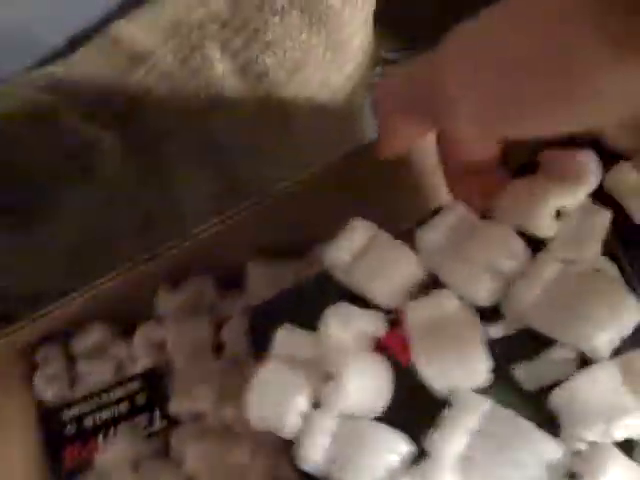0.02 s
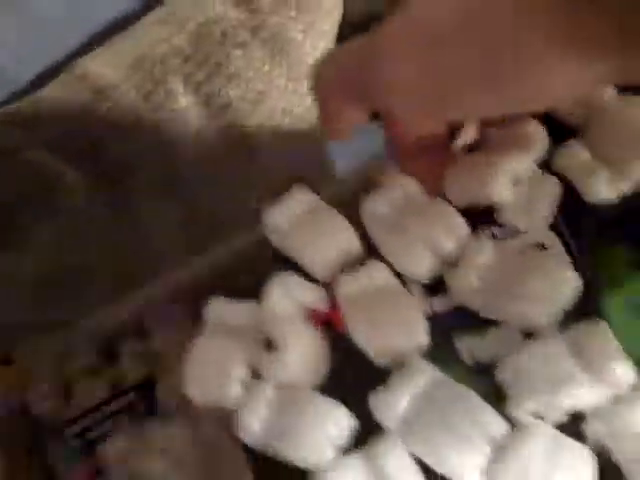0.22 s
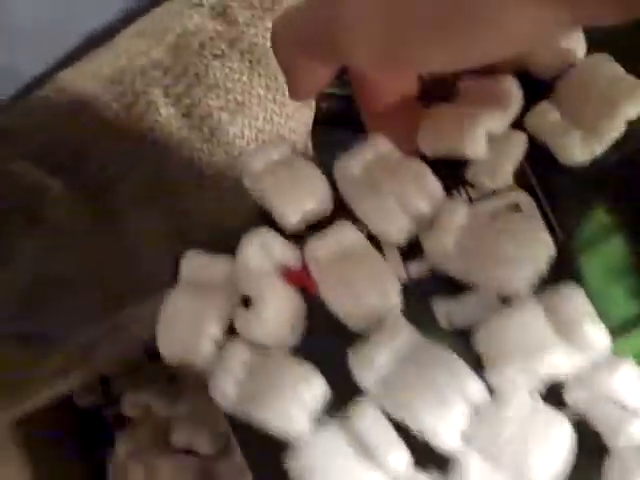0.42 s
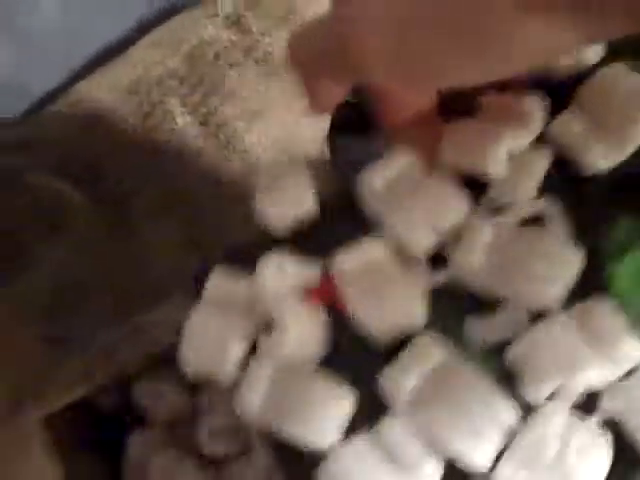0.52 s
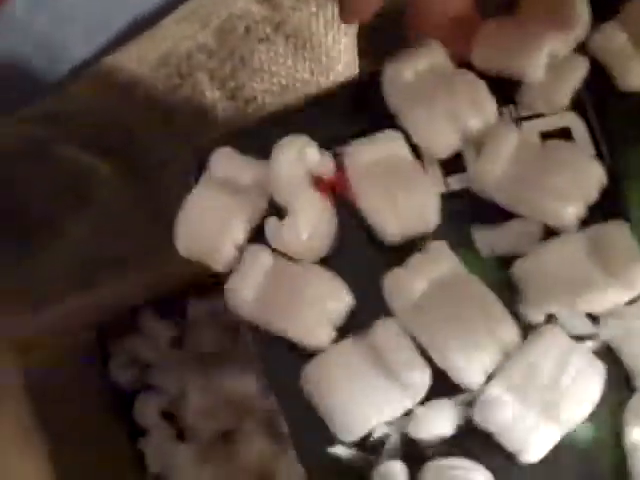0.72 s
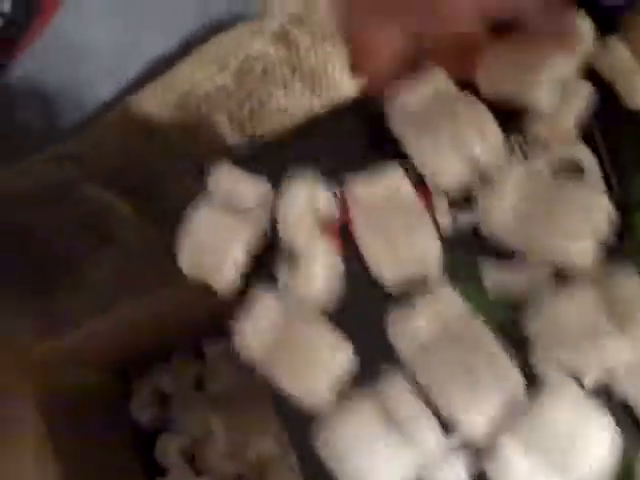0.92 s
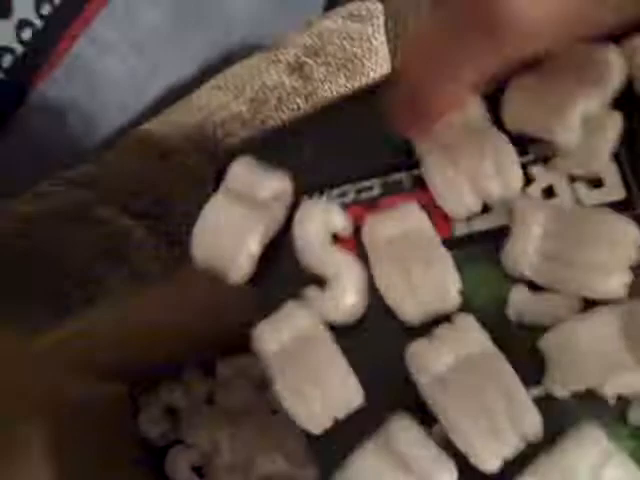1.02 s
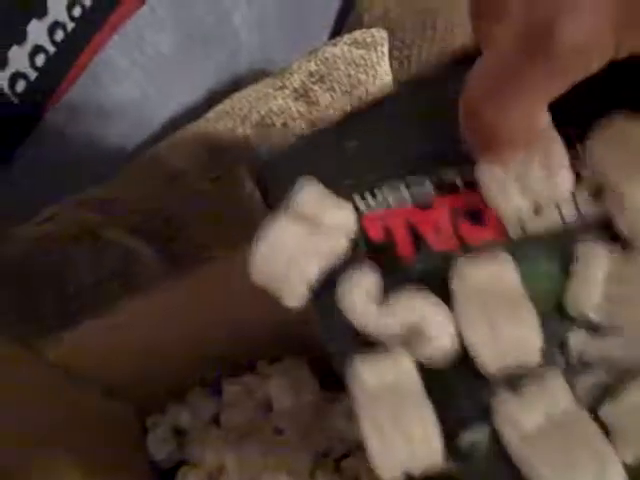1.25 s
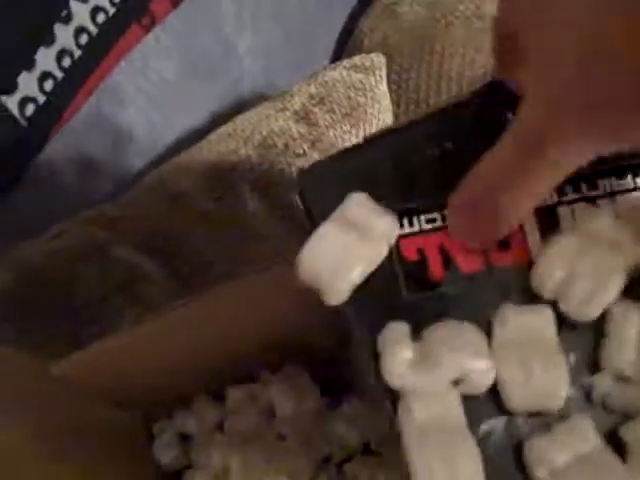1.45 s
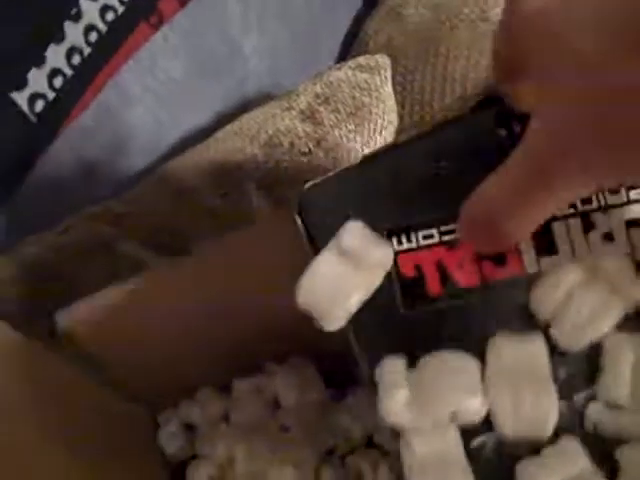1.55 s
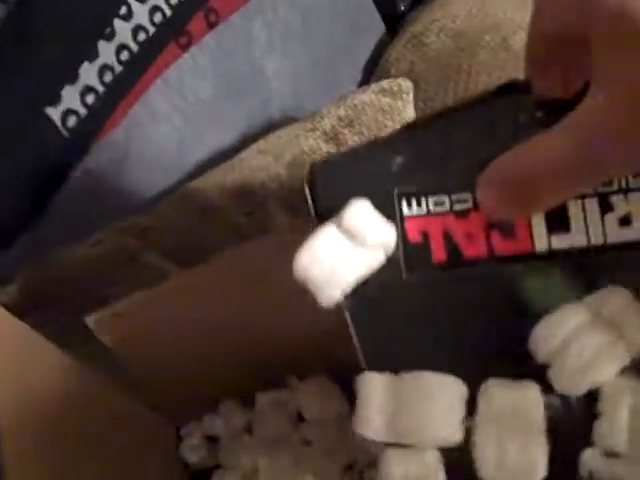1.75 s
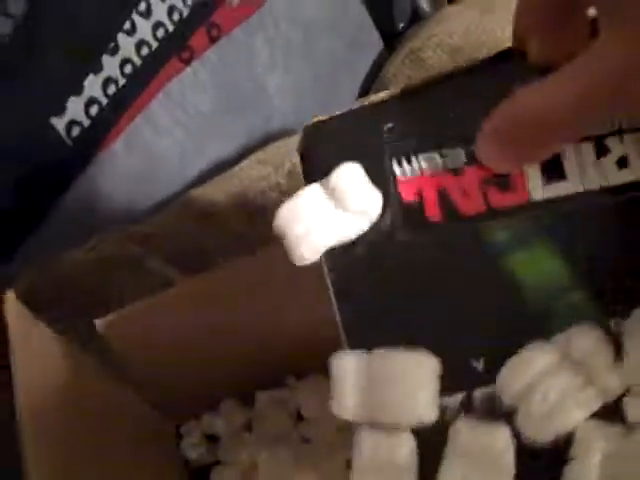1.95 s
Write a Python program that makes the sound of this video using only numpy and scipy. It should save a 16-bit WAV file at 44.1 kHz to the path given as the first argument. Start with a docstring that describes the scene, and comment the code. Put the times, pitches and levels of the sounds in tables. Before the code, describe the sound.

A hand stirs loose foam peanuts and drags a flat package up: faint rubbing, dull box knocks, loud brittle snaps and stuttering squeaks midway, then sparse scuffs, heard very close with bright ringing treble.

```python
"""A hand digs through foam packing peanuts in a cardboard box and draws a flat package up through them.
First the foam rustles and the package scrapes: tiny catches over smooth rubbing, as shaped noise.
Then bumps ring the hollow box as decaying modes; peanuts scuff, crack and squeak in quickening runs of slips.
The stir thins out, with a last few bumps and a scuff near the end; low shoves and a faint room lie under it.
A small camera hears it from close by, its two microphone ports ringing in the treble."""
import sys
import numpy as np
from scipy import signal
from scipy.fft import rfft, irfft
from scipy.io import wavfile
from scipy.ndimage import uniform_filter1d, map_coordinates

SR = 44100
rng = np.random.default_rng(int(sys.argv[2]) if len(sys.argv) > 2 else 0)


def transcribe(u):
    """Save the signal u as a 16-bit wav file named by the first command-line argument.

    u: samples, shape (n,) or (channels, n), limited to [-1, 1]; the rate is SR.
    q: integer samples, one column per channel.
    """
    v = np.clip(np.atleast_2d(u).T, -1, 1)
    q = np.round(v * 32767).astype(np.int16)
    wavfile.write(sys.argv[1], SR, q)


N = 88200
T = np.arange(N) / SR
HZ = np.fft.rfftfreq(2 * N, 1 / SR)
PATCH_WINDOW = 1024  # samples
# friction of sliding surfaces: catches per second, spread of their sizes in dB, power share of smooth rubbing
SLIDING = (980, 2, 0.52)


def amp(db):
    """Decibels to gain."""
    return 10 ** (np.asarray(db) / 20)


def unit(x):
    """Scale to rms 1."""
    return x / np.sqrt(np.mean(x ** 2) + 1e-20)


def along(points, hz=HZ):
    """Interpolate (Hz, value) points on a log frequency axis."""
    f, v = np.transpose(points)
    return np.interp(np.log(hz + 1), np.log(f + 1), v)


def curves(rows):
    """One value per sample for each column after the time."""
    s, *cols = np.transpose(rows)
    return [np.interp(T, s, c) for c in cols]


def wobble(knots_per_s):
    """Smooth random curve through normally distributed knots."""
    knots = rng.standard_normal(int(N * knots_per_s / SR) + 4)
    return map_coordinates(knots, [T * knots_per_s])


def filtered(x, response):
    """Apply a frequency response, zero-padded to twice the length."""
    return irfft(rfft(x, 2 * N) * response)[..., :N]


def colour(points):
    """Minimum-phase response of unit power with the given spectrum, by folding the cepstrum."""
    cepstrum = irfft(np.log(unit(amp(along(points)))))
    cepstrum[1:N] *= 2
    cepstrum[N + 1:] = 0
    return np.exp(rfft(cepstrum))


def spread(pair):
    """Two unrelated signals become a left and right that are partly alike, by frequency."""
    # Each row: frequency in Hz, left-right correlation.
    likeness = [(100, 0.75), (400, 0.86), (1000, 0.69), (3000, 0.55), (6000, 0.58), (8000, 0.17),
                (10000, 0.23)]
    turn = np.arccos(np.clip(along(likeness), -1, 1)) / 2
    mid, side = filtered(pair, np.array([np.cos(turn), np.sin(turn)]))
    return np.array([mid + side, mid - side])


def add(track, start_s, sound):
    """Mix a sound into the track in place."""
    part = track[..., max(round(start_s * SR), 0):][..., :sound.shape[-1]]
    part += sound[..., :part.shape[-1]]


def friction(spectrum, catches_per_s, spread_db, smooth_share):
    """Tiny catches of uneven size over smooth rubbing, coloured; stereo, rms 1."""
    size_db = spread_db * np.clip(rng.standard_normal((2, N)), -2, 2)
    sizes = amp(size_db) * rng.choice([-1, 1], (2, N))
    catches = unit(sizes * (rng.random((2, N)) < catches_per_s / SR))
    rubbing = rng.standard_normal((2, N))
    share = np.clip(smooth_share, 0, 1)
    force = np.sqrt(1 - share) * catches + np.sqrt(share) * rubbing
    return unit(spread(filtered(force, colour(spectrum))))


def patchy(x, depth_db):
    """Random gains, drifting over time and frequency, make the noise uneven in colour; rms 1."""
    z = signal.stft(x, nperseg=PATCH_WINDOW)[2]
    field = rng.standard_normal(z.shape[1:])
    field = uniform_filter1d(field, size=4, axis=0)
    field = uniform_filter1d(field, size=7, axis=1)
    gain = amp(depth_db * np.minimum(unit(field), 1))
    return unit(signal.istft(z * gain, nperseg=PATCH_WINDOW)[1][:, :N])


def stirring():
    """Foam rubs on foam, the package scrapes along, and the box rumbles under both."""
    # Each row: time in seconds, foam rustle in dB before its trim, scrape on cardboard in dB.
    stir_levels = [(0,-33.5,-42), (.04,-38,-44), (.065,-36.5,-32.5), (.1,-36,-42), (.135,-34,-41),
                   (.17,-37,-42.5), (.2,-33,-33.5), (.225,-36.5,-39.5), (.25,-33,-36.5), (.29,-36,-42.5),
                   (.348,-29,-33), (.37,-15.5,-29), (.405,-27,-29), (.435,-28.5,-29.5), (.48,-20.5,-30.5),
                   (.56,-24,-36), (.6,-27.5,-37.5), (.66,-27,-35), (.71,-33,-42.5), (.76,-26.5,-34.5),
                   (.8,-28.5,-40), (.85,-26.5,-45), (.9,-28.5,-42.5), (.96,-30,-38.5), (1.035,-35,-41),
                   (1.08,-18.5,-34), (1.115,-33.5,-43.5), (1.2,-31,-40), (1.228,-28.5,-39.5),
                   (1.25,-28,-61), (1.28,-28,-39), (1.31,-30.5,-45), (1.355,-33,-44.5), (1.385,-30,-37),
                   (1.42,-31.5,-53), (1.44,-32.5,-58), (1.458,-39,-41), (1.48,-35,-39.5), (1.53,-34,-50),
                   (1.62,-35.5,-50), (1.675,-38,-51), (1.77,-35,-45), (1.815,-34,-48.5), (1.88,-38,-50.5),
                   (2.0,-41.5,-54)]
    # Each row: time in seconds, hollow rumble of the box in dB before its trim.
    rumble_levels = [(0,-43), (.15,-44), (.29,-39), (.34,-39.5), (.44,-30.5), (.5,-28.5), (.57,-30),
                     (.68,-45), (.77,-47), (.87,-49.5), (.98,-51), (1.06,-45), (1.18,-46.5), (1.38,-42),
                     (1.415,-54), (1.47,-42.5), (1.55,-50.5), (1.67,-53), (1.79,-43), (2.0,-49.5)]
    # Spectra of foam, scrape and box hollow. Each row: frequency in Hz, relative density in dB.
    foam_spectrum, scrape_spectrum, hollow_spectrum = [(40, -70), (300, -27), (1400, -26.5), (2600, -5),
                                                       (4000, -0.5), (5500, 0.5), (7300, 0.5), (8200, -1.5),
                                                       (9000, -2), (10500, -12.5)], [(30, -61), (110, -33), (300, -11),
                                                                     (650, 5.5), (950, 0.5), (1400, -4),
                                                                     (2200, -0.5), (3200, -2.5), (5000, -8),
                                                                     (9000, -36)], [(25, -56), (60, -29.5),
                                                                                     (110, -23),
                                                                                     (165, -8.5),
                                                                                     (245, 0.5), (340, 0),
                                                                                     (460, -14),
                                                                                     (700, -18.5),
                                                                                     (1500, -50)]
    # Unevenness of the foam's colour. Each row: frequency in Hz, patch depth in dB.
    foam_patches = [(400, 19), (1300, 3), (3000, 3), (7000, 2)]
    rustle_trim_db, scrape_trim_db, rumble_trim_db = -9, 0, -1
    clump_db, judder_db, scrape_patch_db = 1.5, 1.5, 6.5

    foam_db, scrape_db = curves(stir_levels)
    rumble_db, = curves(rumble_levels)
    clumps = wobble(130)
    bands_hz = np.fft.rfftfreq(PATCH_WINDOW, 1 / SR)[:, None]
    crackle = friction(foam_spectrum, catches_per_s=2500, spread_db=18, smooth_share=0.95)
    foam = patchy(crackle, along(foam_patches, bands_hz))
    foam *= amp(foam_db + rustle_trim_db + clump_db * clumps)
    scrape = patchy(friction(scrape_spectrum, *SLIDING), scrape_patch_db)
    scrape *= amp(scrape_db + scrape_trim_db + judder_db * clumps)
    rumble = amp(rumble_db + rumble_trim_db) * friction(hollow_spectrum, *SLIDING)
    return foam + scrape + rumble


def squeaks():
    """A pinched peanut sticks and slips ever faster; each slip cracks and rings it, the crack fading sooner."""
    # Each row: start in seconds, level in dB before trim, first gap between slips in seconds,
    # limiting gap in seconds, ratio of each gap's excess over that limit to the one before,
    # loss per slip in dB, number of slips.
    squeak_runs = [(.818, -18, 0.0031, 0.001, 0.48, 0, 7), (1.0517, -2.5, 0.0088, .0032, 0.69, 1, 12),
                   (1.2291, -0.5, 0.0041, .00067, .6, 1.5, 7), (1.426, -20.5, .004, 0.0012, 0.57, 0, 7)]
    # Slip spectrum. Each row: frequency in Hz, relative density in dB.
    slip_spectrum = [(60, -38), (250, -3), (700, -10), (1500, -4.5), (2200, -11), (4300, -6.5), (6000, -4),
                     (7500, 3.5), (9000, -8), (11000, 1)]
    # Resonances of a squeaking peanut. Each row: frequency in Hz, width in Hz, gain in dB.
    peanut_modes = [(3140, 380, 10.5), (5800, 840, 8), (6990, 300, 3.5)]
    trim_db, extra_crack_loss_db = 1, 0.8  # loss per slip

    crack_pulses, kicks = np.zeros(N), np.zeros(N)
    for slip_s, db, first_gap_s, final_gap_s, shrink, loss_db, count in squeak_runs:
        for k in range(round(count)):
            size = amp([db + trim_db - loss_db * k + 0.5 * rng.standard_normal()])
            add(kicks, slip_s, size)
            add(crack_pulses, slip_s, size * amp(-extra_crack_loss_db * k))
            slip_s += final_gap_s + (first_gap_s - final_gap_s) * shrink ** k
    ring = 0
    for hz, width_hz, db in peanut_modes:
        damping = 1j * HZ * width_hz
        ring = ring + amp(db) * damping / (hz ** 2 - HZ ** 2 + damping)
    return filtered(crack_pulses + filtered(kicks, ring), colour(slip_spectrum))


def cracks():
    """One needle-sharp tick, a coloured impulse, each time a peanut springs free."""
    # Each row: time in seconds, level in dB.
    crack_times = [(.481, -13), (1.1326, -14), (1.1596, -1), (1.1604, -14), (1.2297, 1), (1.385, -14.5),
                   (1.619, -17.5)]
    # Tick spectrum. Each row: frequency in Hz, relative density in dB.
    crack_spectrum = [(100, -23), (900, -5), (1500, -6), (3000, 8.5), (4500, -12.5), (7000, 4.5),
                      (10000, 4)]
    ticks = np.zeros(N)
    for start_s, db in crack_times:
        add(ticks, start_s, amp([db]))
    return filtered(ticks, colour(crack_spectrum))


def scuffs():
    """Peanuts scuff along the package: short dry scrapes of friction noise, uneven in colour."""
    # Each row: start in seconds, level in dB, t60 in seconds.
    scuff_times = [(0.746, -28, .032), (1.275, -33, 0.034), (1.383, -42, .025), (1.475, -29.5, 0.037),
                   (1.689, -23, 0.053), (1.813, -30, 0.016)]
    # Scuff spectrum. Each row: frequency in Hz, relative density in dB.
    scuff_spectrum = [(150, -36), (600, 8), (1300, 0), (2300, 10), (4500, -3), (7000, -3.5), (10000, 0.5)]
    attack_s, patch_db = 0.0014, 5
    swell = np.zeros(N)
    for start_s, db, t60_s in scuff_times:
        add(swell, start_s, amp(db - 60 * T / t60_s) * (1 - np.exp(-T / attack_s)))
    return swell * patchy(friction(scuff_spectrum, *SLIDING), patch_db)


def bumps():
    """Each bump rings the cardboard's modes over a dull thud: one push and a short noise rattle."""
    # Each row: start in seconds, ring level in dB, ring tilt in dB per octave above the strongest mode,
    # rattle level in dB before colouring.
    bump_times = [(.336, -32, -0.5, -38), (.391, -14, -6.5, -20), (.399, -17, -6, -27),
                  (.415, -19.5, -8, -32), (.459, -25.5, -1.5, -33.5), (.479, -20, 0.5, -27),
                  (.492, -37, -20, -42), (1.018, -28, -0.5, -33), (1.043, -35.5, -1.5, -41),
                  (1.118, -32.5, -15, -35), (1.288, -31.5, 1.5, -34), (1.465, -43.5, 6, -48),
                  (1.718, -32, 7, -30.5), (1.7215, -25.5, -11, -24), (1.736, -27.5, 3, -41)]
    # Cardboard modes. Each row: nominal frequency in Hz, nominal level in dB, t60 in seconds.
    box_modes = [(80.4, -25, 0.088), (164.8, -18, 0.46), (215, -10.5, 0.15), (255, 0, 0.11),
                 (371.7, -2, 0.057), (441, -3.5, 0.063), (608, -2, 0.031), (703, -7.5, 0.055),
                 (814, -6.5, 0.054), (981, -8.5, 0.042), (1187, -7.5, 0.027), (1360, -20, 0.062),
                 (1592, -16.5, 0.065), (2180, -26, 0.037)]
    # Thud spectrum. Each row: frequency in Hz, relative density in dB.
    thud_spectrum = [(30, -40), (80, -11), (170, 7), (380, 9), (700, -4.5), (1500, -14.5), (2300, -14),
                     (4000, -38), (8000, -60)]
    attack_s, thud_t60_s = 0.00096, 0.048
    push_db = 23.5  # impulse over rattle

    rings, thuds, t = np.zeros(N), np.zeros(N), T[:SR // 3]
    hz, mode_db, t60_s = np.transpose(box_modes)[:, :, None]
    octaves = np.maximum(np.log2(hz / hz[np.argmax(mode_db)]), 0)
    rise = 1 - np.exp(-t / attack_s)
    for start_s, ring_db, tilt_db, thud_db in bump_times:
        size, detune, phase = rng.standard_normal((3, len(hz), 1))
        level_db = mode_db + tilt_db * octaves + 1.8 * size
        tones = np.sin(2 * np.pi * (hz * (1 + 0.016 * detune) * t + phase))
        modes = amp(level_db - 60 * t / t60_s) * tones
        add(rings, start_s, amp(ring_db) * rise * modes.sum(0))
        add(thuds, start_s, amp([thud_db + push_db]))
        rattle = rise * rng.standard_normal(len(t))
        add(thuds, start_s, amp(thud_db - 60 * t / thud_t60_s) * rattle)
    return rings + filtered(thuds, colour(thud_spectrum))


def shoves():
    """Low, soft swells of noise as the hand pushes against the box."""
    # Each row: centre in seconds, level in dB, full width at 1/e in seconds.
    shove_times = [(0.123, -61, 0.021), (0.33, -43, 0.056), (0.42, -37, 0.13), (0.622, -52.5, 0.18),
                   (1.122, -54, 0.016), (1.221, -56, 0.022), (1.307, -58, 0.032), (1.464, -54.5, 0.034),
                   (1.608, -51, 0.057), (1.749, -40.5, 0.087)]
    # Shove spectrum. Each row: frequency in Hz, relative density in dB.
    shove_spectrum = [(25, -26), (45, -42), (65, -1), (100, 6.5), (160, -3), (260, 1), (600, -49)]
    push = np.zeros(N)
    for centre_s, db, width_s in shove_times:
        push += amp(db) * np.exp(-(2 * (T - centre_s) / width_s) ** 2)
    noise = rng.standard_normal((2, N))
    return push * unit(spread(filtered(noise, colour(shove_spectrum))))


def room(x):
    """The short answer of a furnished room: convolution with decaying noise."""
    t60_s = 0.073
    tail = spread(rng.standard_normal((2, N))) * amp(-60 * T / t60_s)
    return signal.fftconvolve(x, tail / np.linalg.norm(tail[0]), axes=1)[:, :N]


def scene():
    """Everything in the box, with a little room."""
    room_db = -10.5
    near = stirring() + squeaks() + cracks() + scuffs() + bumps() + shoves()
    return near + amp(room_db) * room(near)


def record(dry):
    """Each port resonates at its own pitch; peaks clip, then a steep low-pass limits the band."""
    # Left, then right microphone port. Each row: resonance in Hz, width in Hz.
    ports = [(7337, 1266), (6290, 1010)]
    # Tone of the right channel: fuller in the bass, duller at the top. Each row: frequency in Hz, gain in dB.
    right_tone = [(60, 5.5), (150, 2.3), (350, 1), (1000, 1), (2500, 0.17), (5500, -1.9), (7500, -5.5),
                  (9500, -9.5)]
    clip_level, top_hz = 0.97, 10500
    left, right = [hz ** 2 / (hz ** 2 - HZ ** 2 + 1j * HZ * width_hz) for hz, width_hz in ports]
    right = right * amp(along(right_tone))
    heard = np.clip(filtered(dry, np.array([left, right])), -clip_level, clip_level)
    return filtered(heard, 1 / np.sqrt(1 + (HZ / top_hz) ** 70))


dry = scene()
out = record(dry)
transcribe(out)
```